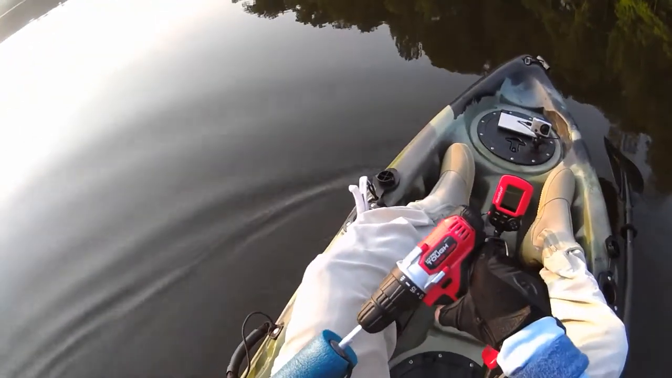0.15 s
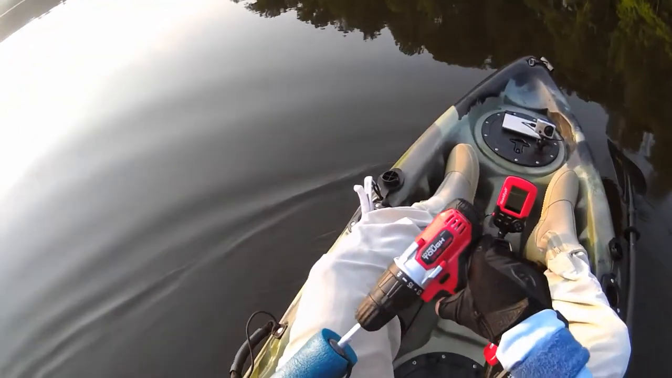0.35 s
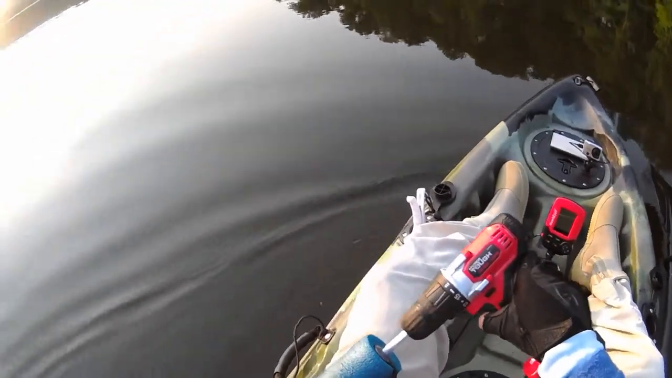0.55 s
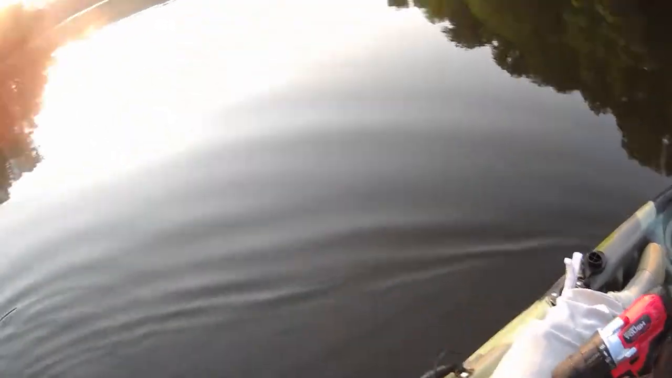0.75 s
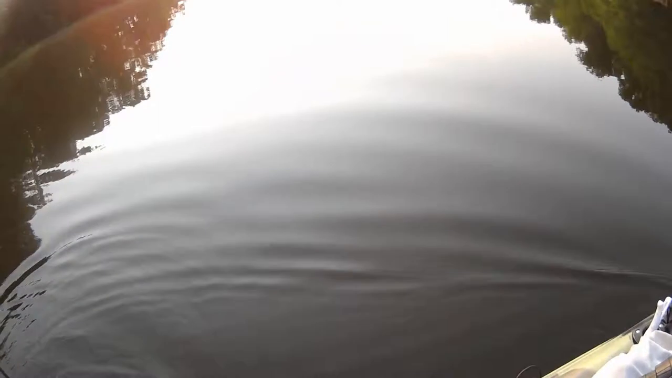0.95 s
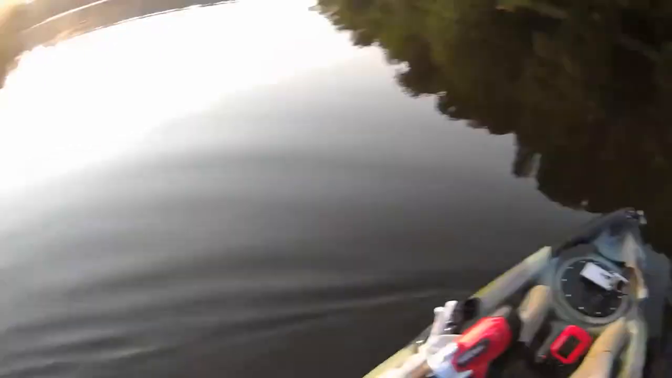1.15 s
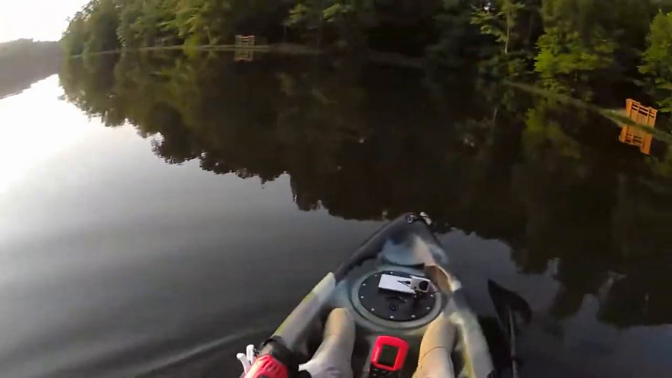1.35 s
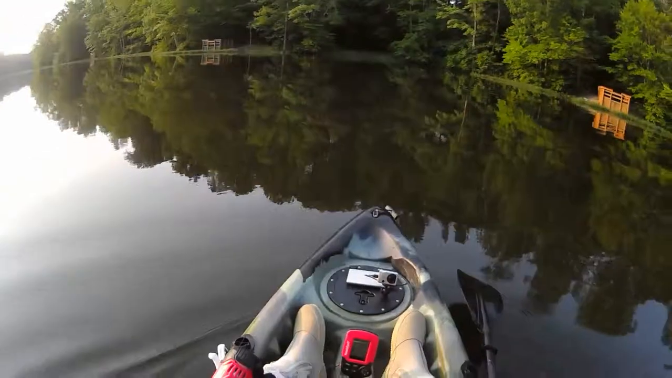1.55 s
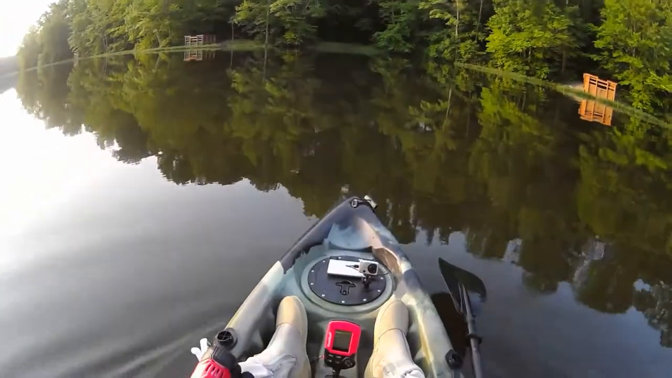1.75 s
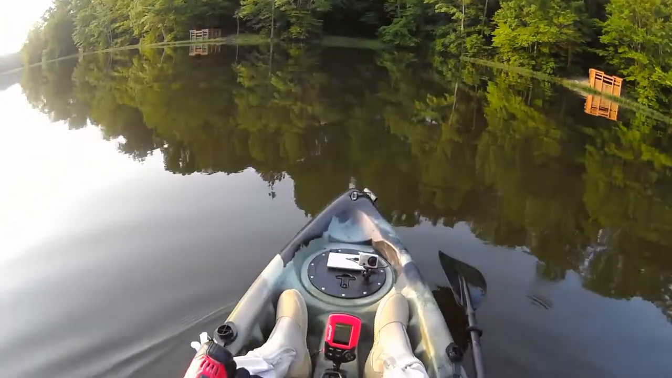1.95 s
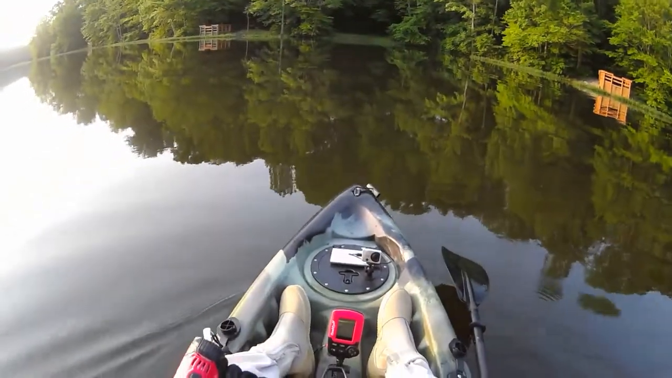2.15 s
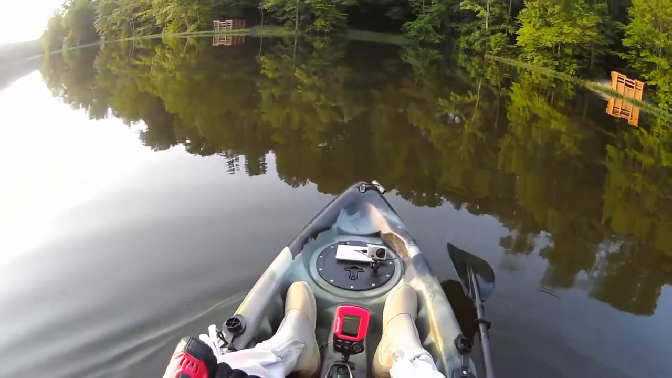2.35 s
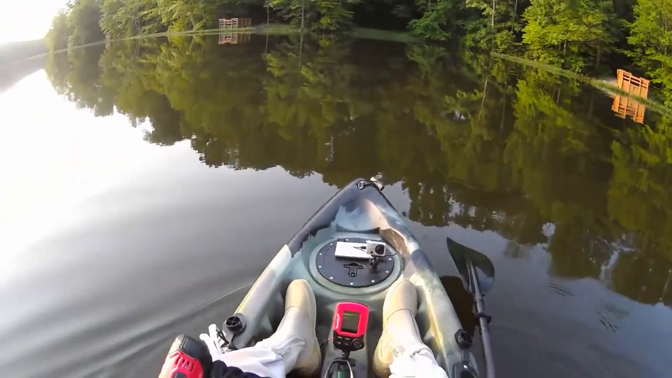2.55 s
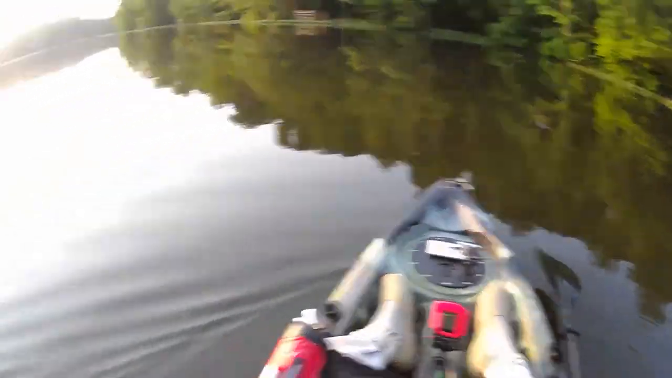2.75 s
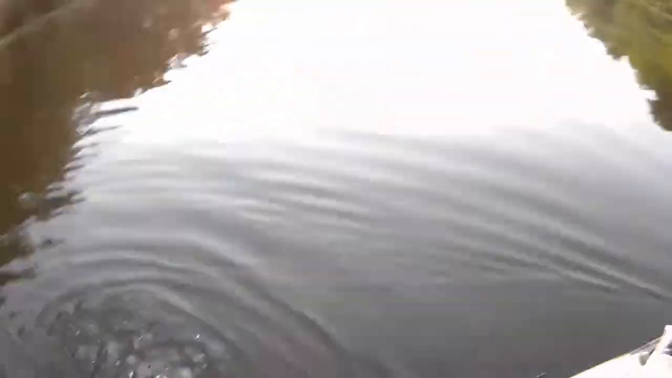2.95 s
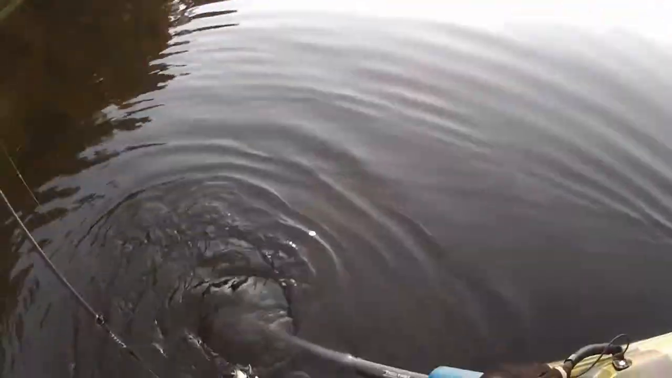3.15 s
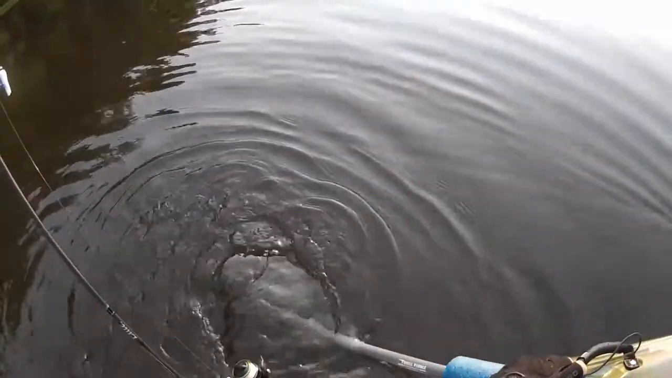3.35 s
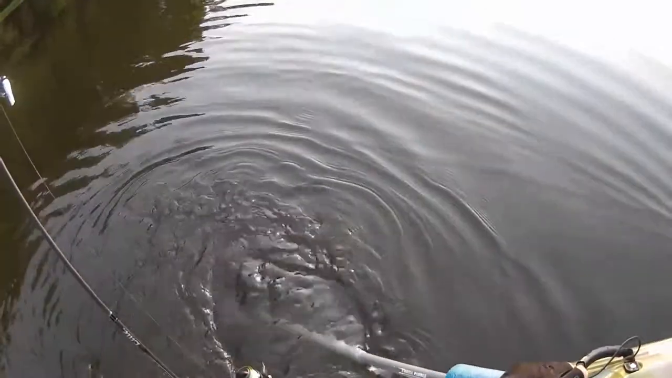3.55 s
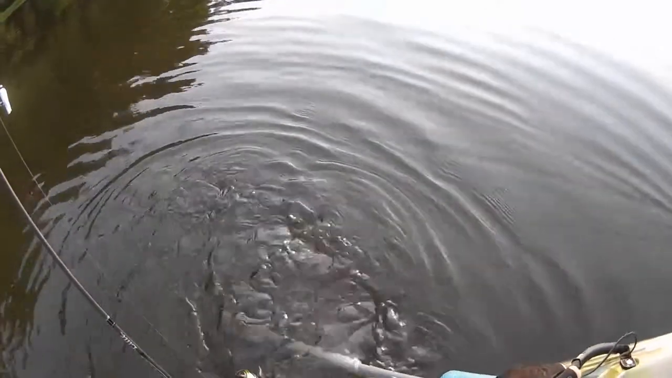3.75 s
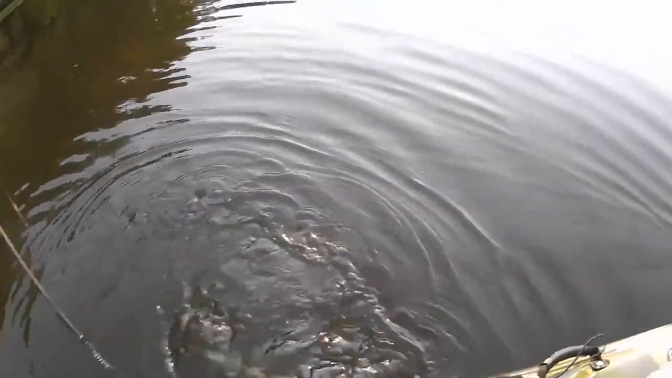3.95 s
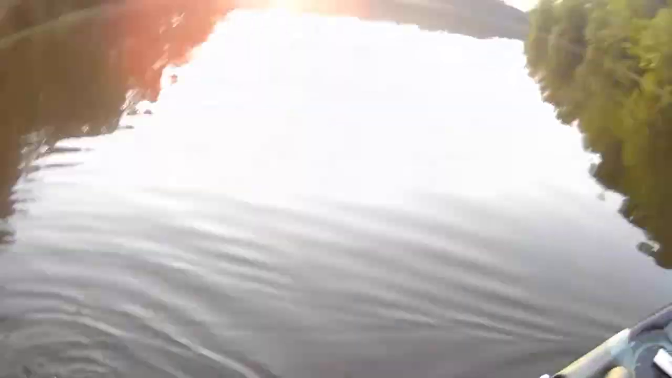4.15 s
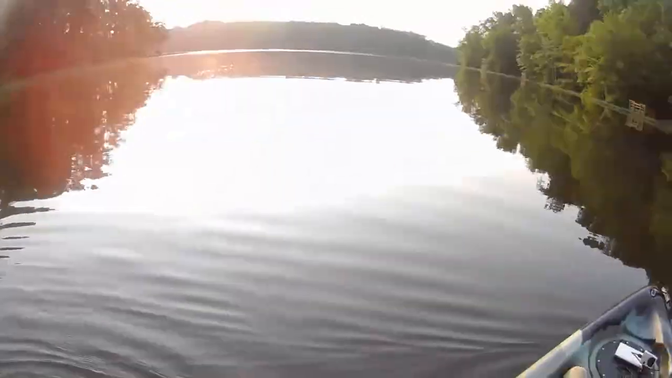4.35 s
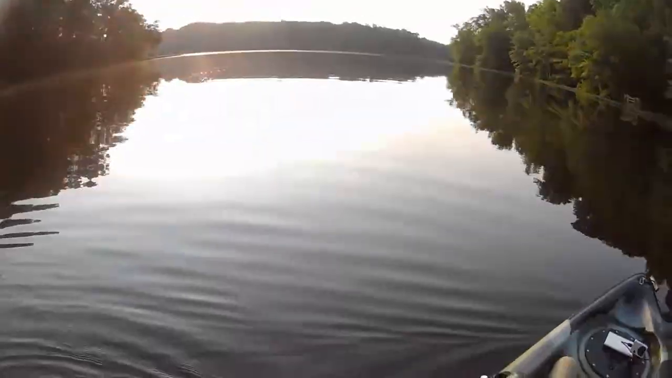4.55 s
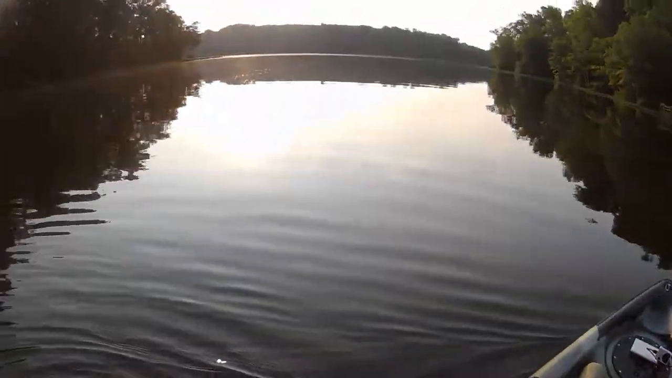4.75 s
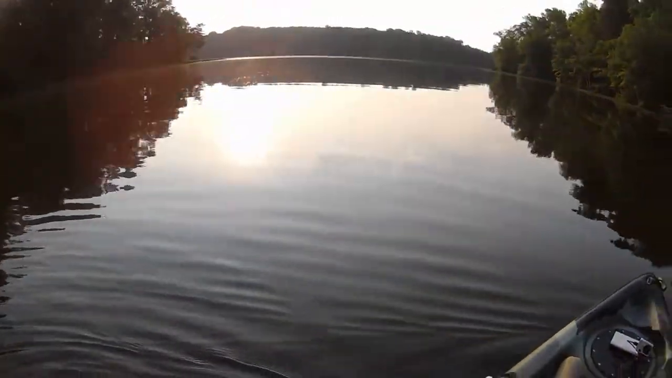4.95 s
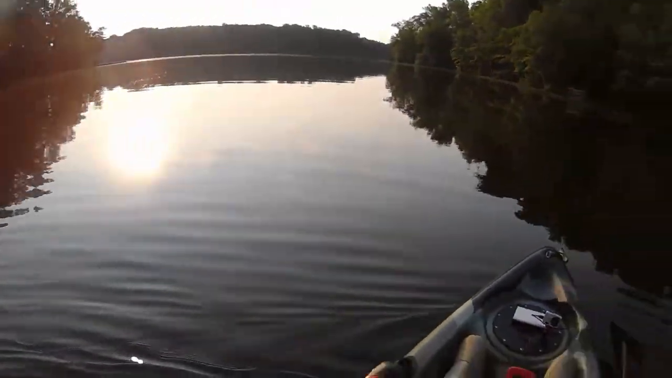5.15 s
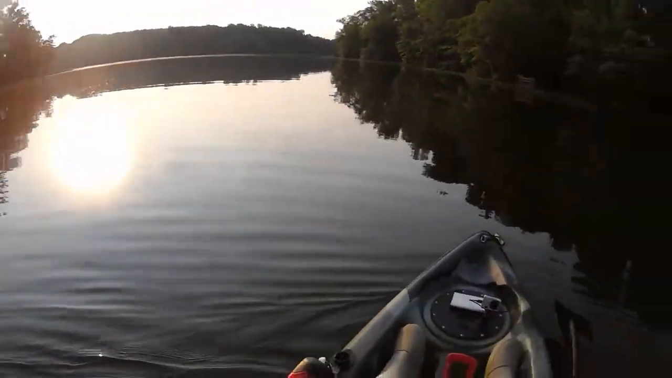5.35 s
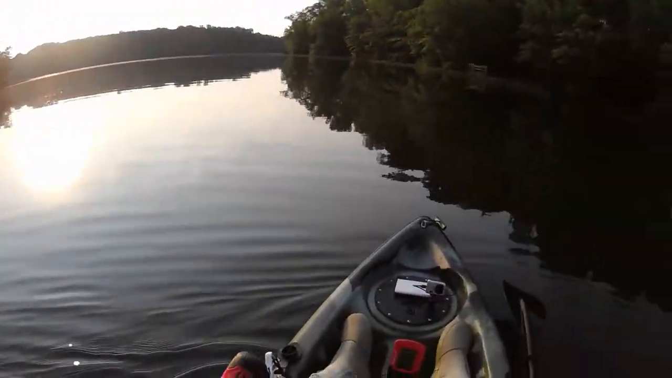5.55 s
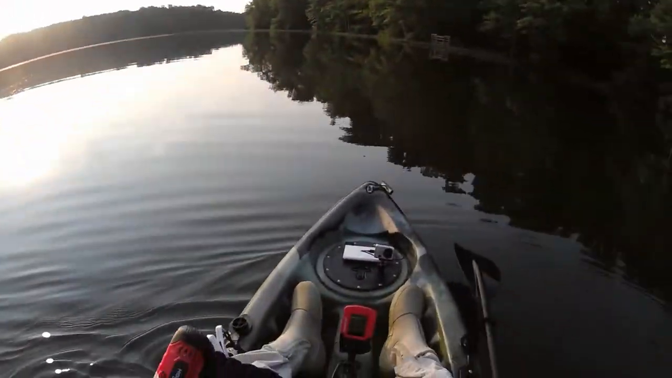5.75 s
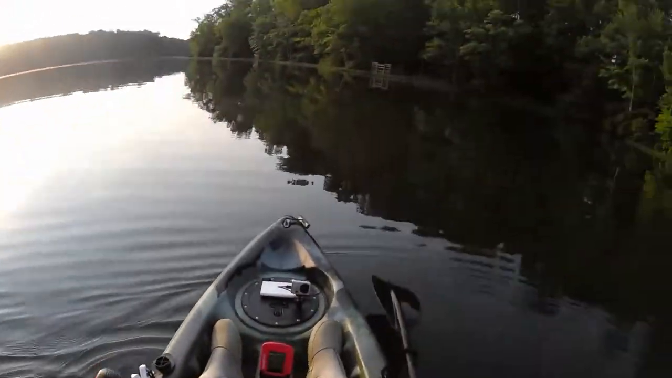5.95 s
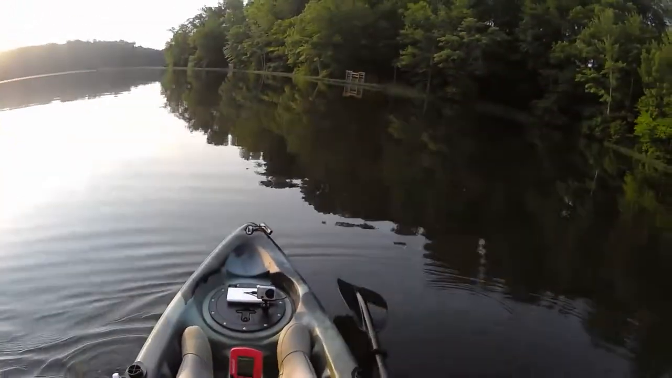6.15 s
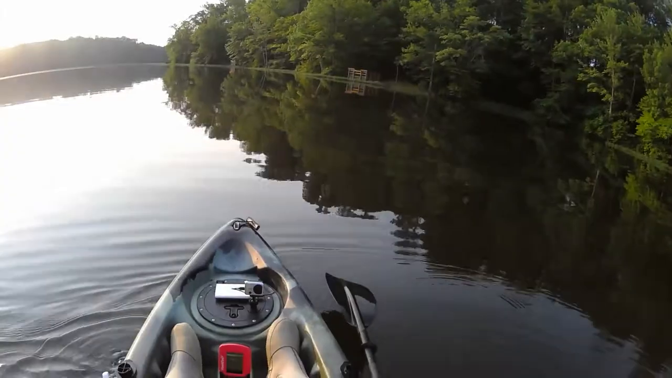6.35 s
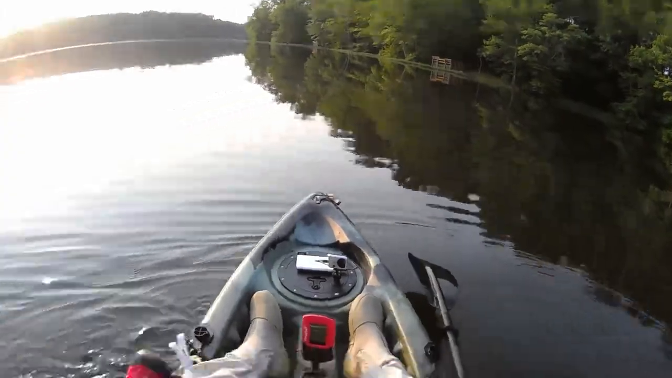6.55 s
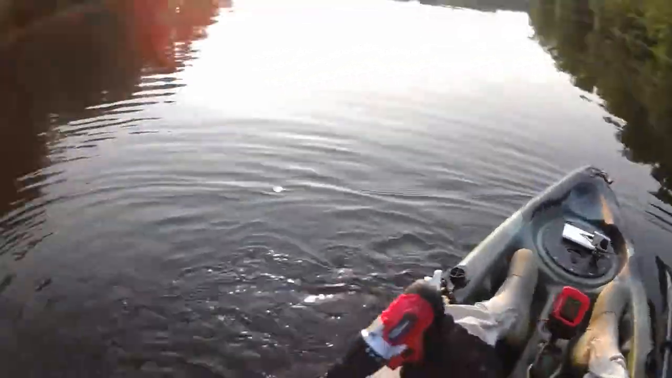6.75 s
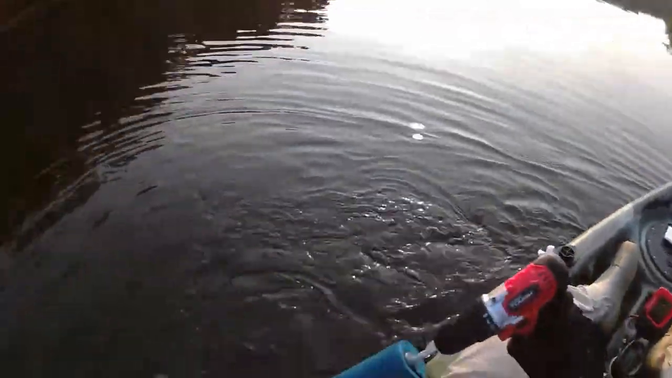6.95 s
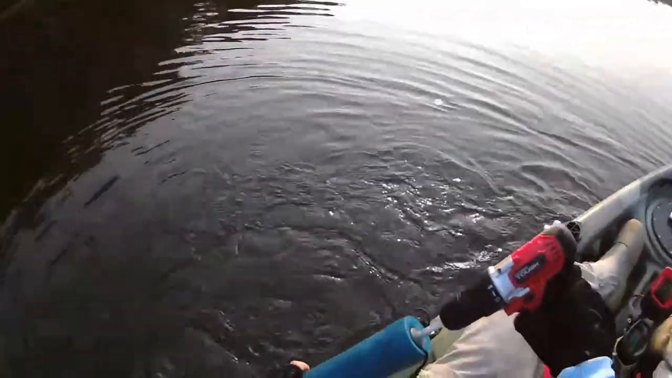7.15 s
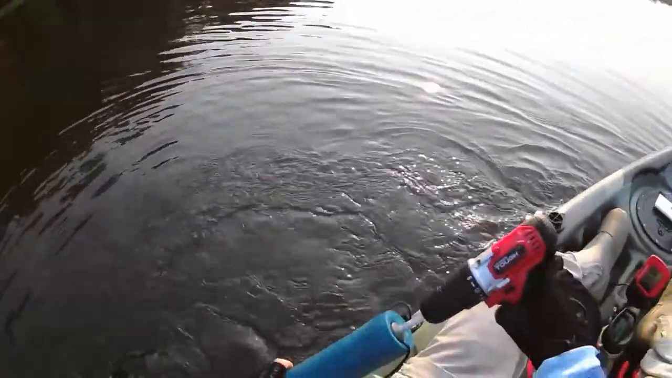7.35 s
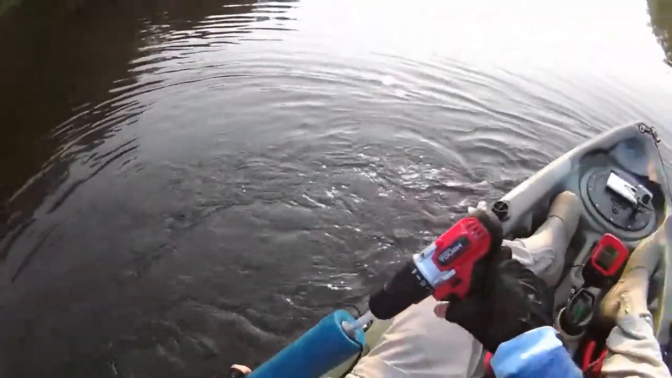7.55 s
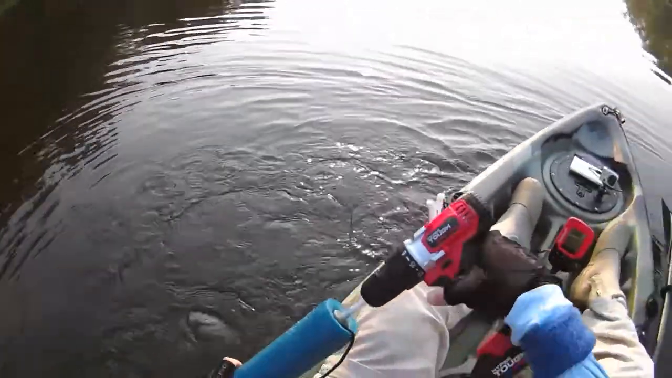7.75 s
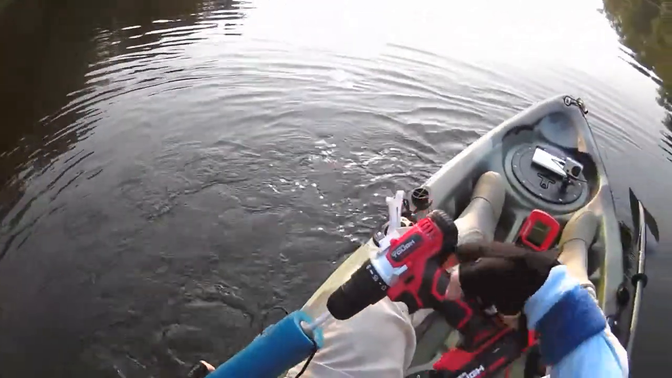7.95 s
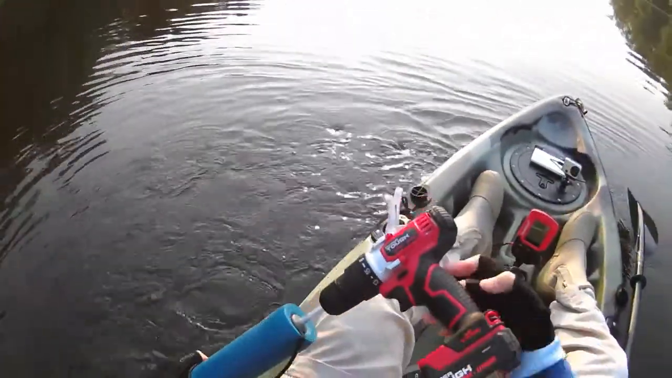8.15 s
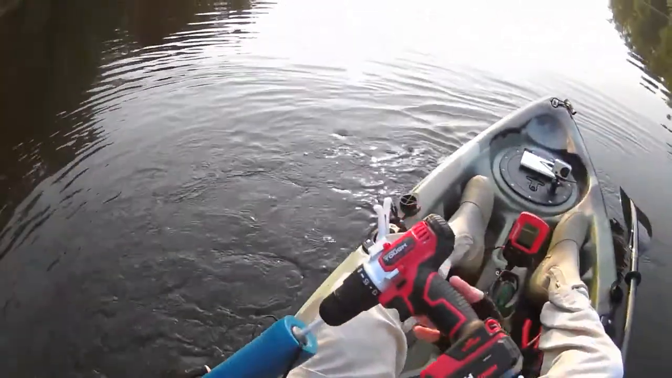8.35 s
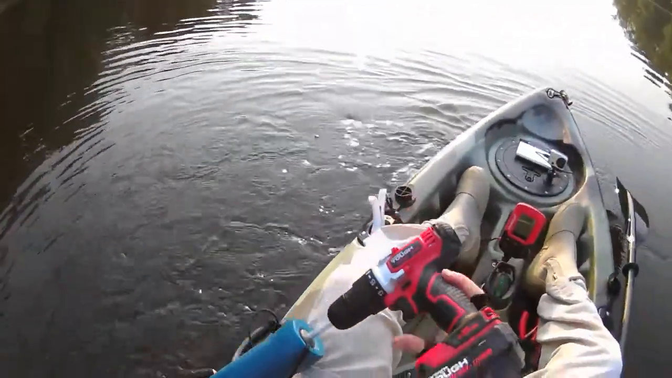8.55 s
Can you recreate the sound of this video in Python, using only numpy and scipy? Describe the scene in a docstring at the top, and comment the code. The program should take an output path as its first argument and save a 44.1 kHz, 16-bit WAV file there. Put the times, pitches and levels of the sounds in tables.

```python
"""On a calm lake, a cordless drill in a kayak spins a propeller shaft, heard from the paddler's head as it turns about.
The trigger is squeezed, eased, held and let go. Motor and two planetary stages (36 motor turns to one shaft turn)
sing as sines at whole multiples of the shaft speed, over noise and tooth knocks that throb once a turn.
The propeller gurgles in rising blips; filtered noise laps as the lake, faint glides whistle as birds, and
damped sines make the thuds, clicks and ticks."""
import sys
import numpy as np
from scipy import signal
from scipy.io import wavfile
from scipy.ndimage import uniform_filter1d

SR = 44100
rng = np.random.default_rng(int(sys.argv[2]) if len(sys.argv) > 2 else 0)


def master_out(mix):
    """Clip the mix to full scale and print it as 16-bit PCM to the path in sys.argv[1]."""
    frames = np.transpose(np.atleast_2d(mix))
    ceiling = np.clip(frames, -1, 1)
    pcm = np.round(ceiling * 32767).astype(np.int16)
    wavfile.write(sys.argv[1], SR, pcm)


N = 383312

GEARING = 36  # motor turns to one shaft turn
# gears start to turn, slack is taken up, braking begins, the drill's sound dies away [s]
START_S, BITE_S, BRAKE_S, STOP_S = 0.3053, 0.3375, 7.49, 7.548
RISE_DB_PER_S = 1306
# motor speed, squeezed, eased, squeezed again, held and braked: (time [s], speed [Hz])
MOTOR_SPEED = [(.29, 130), (.33, 170), (.35, 231), (.37, 272), (.41, 296), (.45, 311), (.47, 313.5),
               (.51, 264), (.54, 228), (.57, 200), (.61, 188), (.65, 196), (.68, 245), (.7, 284),
               (.72, 302), (.76, 318), (.9, 325), (1.3, 329.8), (2.5, 331.1), (3.5, 334.3), (4.9, 337.4),
               (6.5, 338.1), (7.49, 338.1), (7.512, 297), (7.522, 251), (7.534, 187), (7.545, 146),
               (7.58, 99)]
# share of the treble control felt at each frequency: (frequency [Hz], share [1])
TREBLE_SHARE = [(1500, 0.29), (2500, 1), (3200, 1.6), (3650, 0.49), (5000, 0.9), (6000, 0.76), (7600, 0.64)]
# what reaches the microphone as the head turns: (time [s], whole drill [dB], treble [dB], hollow body tone [dB],
# magnetic whine [dB], rotor hum [dB], first-stage mesh [dB])
HEAD_TURNS = [(.3, 3, 9, 4, -37.5, -55, -56), (.35, -0.5, 9.5, 1, -39, -48, -33),
              (.375, -.5, 5.5, 2.5, -38, -50, -58), (.42, -1, 4, 2, -38.5, -49, -52),
              (.45, -2.5, 6, 3, -42.5, -49.5, -40), (.5, -.5, 3, 1, -37, -50, -50),
              (.545, 0, 2.5, 1, -36, -52, -23), (.6, 0.5, 2, 0.5, -34, -55, -42),
              (.65, .5, 1.5, 0, -37, -55, -33), (.69, 1, 1.5, -1, -38, -55.5, -58),
              (.74, 0, 3.5, 0.5, -45.5, -56, -36.5), (.85, -1, 3.5, 6.5, -39.5, -45, -41),
              (1.3, 1, 0.5, 0, -40.5, -61, -43), (2.4, 2, -1.5, -2, -41, -58, -44.5),
              (3.0, 1, 1, 4, -43, -46.5, -50.5), (3.5, 0.5, 2, 4, -45.5, -43, -55),
              (4.3, 0.5, 1, 2, -48, -44.5, -52.5), (5.5, 0.5, 0.5, -3, -42.5, -43.5, -48.5),
              (6.3, 1, -3.5, -2.5, -44, -44.5, -55), (6.6, 1, -2, -2.5, -44, -43, -51),
              (6.76, 1, 3, -2.5, -44, -42, -51), (7.44, 0.5, 5, -4, -44, -43.5, -45.5),
              (7.5, 1, 1.5, -3.5, -45, -46, -53), (7.55, 4, 5.5, 1, -37, -48, -52)]


def gain_of(db):
    """Level: 20 dB is a tenfold amplitude."""
    return 10 ** (np.asarray(db) / 20)


def evened(x):
    """Normalization: scales a signal to rms 1."""
    return x / np.sqrt(np.mean(x ** 2) + 1e-20)


def read(points, hz):
    """Spectral interpolation: reads a curve on a log-frequency axis."""
    f, value = np.transpose(points)
    return np.interp(np.log(hz + 1), np.log(f + 1), value)


def curves(rows, t):
    """Linear interpolation: every column of a table against time."""
    s, *columns = np.transpose(rows)
    return [np.interp(t, s, column) for column in columns]


def slow(rate_hz):
    """Low-passed noise: a smooth random curve of rms 1, cut off at rate_hz."""
    steps = np.arange(0, N + 200, 100)
    b, a = signal.butter(2, rate_hz, fs=SR / 100)
    smooth = evened(signal.lfilter(b, a, rng.standard_normal(len(steps))))
    return np.interp(np.arange(N), steps, smooth)


def coloured(x, field_db):
    """Time-varying filtering: applies a gain over frequency and time to the short-time spectrum."""
    hz, t, z = signal.stft(x, SR, nperseg=512, noverlap=384)
    shaped = z * gain_of(field_db(hz[:, None], t))
    return signal.istft(shaped, SR, nperseg=512, noverlap=384)[1][:N]


def placed(sound, s):
    """Time shift: sets a short sound at s seconds in silence."""
    return np.pad(sound, (round(s * SR), N))[:N]


def lake():
    """Broadband water noise: far low rumble and lapping in drifting patches, swelling around the stop as the wake."""
    # spectrum of the water: (frequency [Hz], relative level [dB per Hz])
    water_spectrum = [(20, -27.5), (50, -7.5), (100, -2.5), (200, -5.5), (300, -6.5), (480, -15.5),
                      (770, -15.5), (1100, -22), (1550, -33), (1850, -44.5), (3000, -47.5), (4700, -48),
                      (6800, -43), (7600, -49)]
    lake_db, wake_db, wake_s = -53, 3.5, .35

    def field_db(hz, t):
        patches = rng.standard_normal((len(hz), len(t)))
        patches = uniform_filter1d(patches, 35, 1)  # along time
        patches = uniform_filter1d(patches, 4, 0)  # along frequency
        depth_db = np.where(hz < 2000, 2.6, 1.2)
        return read(water_spectrum, hz) + depth_db * evened(patches)
    after = np.arange(N) / SR - STOP_S
    swell_db = wake_db * np.exp(-abs(after) / wake_s)
    water = evened(coloured(rng.standard_normal(N), field_db))
    return gain_of(lake_db + swell_db + .7 * slow(6)) * water


def birds():
    """Frequency modulation: faint short gliding whistles from the far shore, scattered at random or set singly."""
    # the clearest whistles: (time [s], length [s], level [dB], middle frequency [Hz], glide [Hz per s])
    clear_whistles = [(.045, .025, -80, 4330, 0), (.162, .03, -74, 2050, 0), (.265, .035, -77, 3950, 0),
                      (7.755, .05, -78, 2820, 1200), (7.83, .04, -77, 1960, -800),
                      (7.845, .05, -81, 2370, -600), (8.045, .035, -79, 3070, -1500),
                      (8.085, .03, -81, 2800, -1500), (8.2, .07, -81, 2150, 300),
                      (8.325, .055, -77, 2880, -400), (8.37, .04, -79, 2630, -500)]
    birds_db, birds_per_s = -90, 30
    scattered, t = np.zeros(N), np.arange(0, .045, 1 / SR)
    for pitch, glide, size in rng.random((40, 3)):
        hz = 1600 + 1300 * pitch ** 1.1
        chirp = np.sin(2 * np.pi * hz * t * (1 + 1.7 * (glide - .6) * t)) * np.hanning(len(t))
        onsets = rng.random(N) < birds_per_s / 40 / SR
        scattered += signal.oaconvolve(onsets, chirp * gain_of(9 * size))[:N]
    out = gain_of(birds_db) * scattered
    for s, length, db, hz, glide in clear_whistles:
        t = np.arange(0, length, 1 / SR)
        chirp = np.sin(2 * np.pi * (hz + glide * (t - length) / 2) * t) * np.hanning(len(t))
        waver = 1 + .6 * evened(uniform_filter1d(rng.standard_normal(len(t)), 150))
        out += placed(gain_of(db) * chirp * waver, s)
    return out


def rub():
    """Friction noise: a soft wide-band brush of glove on plastic."""
    start_s, rise_s, level_db = 8.615, .03, -72
    u = np.maximum(np.arange(N) / SR - start_s, 0) / rise_s
    b, a = signal.butter(1, [1200, 5000], "band", fs=SR)
    brush = evened(signal.lfilter(b, a, rng.standard_normal(N)))
    return gain_of(level_db) * u * np.exp(1 - u) * brush


def bumps():
    """Impact on a resonant hull: dull thuds of a ring and noise over a deeper boom, rising fast and falling slower."""
    # shaft and drill bumping the hull, and jolts of the head:
    # (time [s], level before the envelope [dB], time scale [s], ring frequency [Hz])
    hull_bumps = [(1.14, -35, 0.062, 85), (1.145, -36, .05, 160), (2.835, -34, 0.09, 65),
                  (2.84, -35, .07, 130), (3.089, -35, 0.045, 290), (4.088, -28, 0.055, 235),
                  (4.154, -23.5, 0.06, 240), (4.185, -30, .06, 335), (4.255, -29.5, 0.06, 245),
                  (4.285, -32, .05, 320), (4.368, -25.5, 0.055, 250), (4.485, -25.5, 0.058, 245)]
    out = np.zeros(N)
    for s, db, length, hz in hull_bumps:
        u = np.arange(0, .25, 1 / SR) / length
        thud = np.sin(2 * np.pi * hz * length * u)
        # noise around the ring, then the boom
        for low_hz, high_hz, share in [(.55 * hz, 1.5 * hz, .4), (60, 190, .2)]:
            sos = signal.butter(2, [low_hz, high_hz], "band", fs=SR, output="sos")
            noise = signal.sosfilt(sos, rng.standard_normal(2 * len(u)))
            thud = thud + share * evened(noise[len(u):])  # the filter has settled
        envelope = u * np.exp(1 - (2.0 * u) ** 2)
        out += placed(gain_of(db) * thud * envelope, s)
    return out


def damped_rings(rows, rough):
    """Damped free vibration: short decaying sines with a noisy strength."""
    out, t = np.zeros(N), np.arange(0, .3, 1 / SR)
    for s, db, hz, t60 in rows:
        span = int(SR / hz * 2)  # two periods
        noise = uniform_filter1d(rng.standard_normal(len(t)), span)
        wobble = 1 + rough * evened(uniform_filter1d(noise, span))
        envelope = gain_of(db - 60 * t / t60) * (1 - np.exp(-t * hz / 3)) ** 2
        out += placed(envelope * wobble * np.sin(2 * np.pi * hz * t), s)
    return out


def clicks_and_taps():
    """Modal impact response: trigger clicks excite five modes; ticks of gear slack, grip and water drips excite
    one each."""
    # modes of the trigger: (frequency [Hz], relative level [dB], t60 [s])
    trigger_modes = [(1710, -10, 0.027), (2890, -0.5, 0.027), (3150, 0.5, 0.024), (4520, -14, .018),
                     (5900, -18, 0.016)]
    # trigger clicks: (time [s], level before the envelope [dB])
    trigger_clicks = [(.21, -49), (0.338, -20.5)]
    # ticks of gear slack, grip and water drips: (time [s], level before the envelope [dB], frequency [Hz], t60
    # [s])
    single_taps = [(.08, -50, 1190, .07), (.24, -62, 1490, 0.18), (0.273, -46, 1850, 0.069),
                   (0.317, -24, 1618, 0.05), (.298, -41, 3250, .03), (.316, -37, 3300, .02),
                   (.323, -35, 2950, .025), (.33, -33, 1480, .05), (0.338, -23.5, 2230, 0.031),
                   (7.523, -27, 1420, .05), (8.045, -46.5, 1190, .07), (8.624, -50, 1250, .08),
                   (8.63, -48, 700, .05), (8.649, -56, 1900, 0.044), (8.648, -67, 2550, .04),
                   (8.65, -72, 4900, .04), (8.652, -73, 5800, .03)]
    clicks = [(s, db + mode_db, hz, t60) for s, db in trigger_clicks for hz, mode_db, t60 in trigger_modes]
    return damped_rings(clicks + single_taps, rough=0.55)


def shaft():
    """Rotation as integrated speed: shaft angle in turns, plain and unsteady, as the load slows it once a turn."""
    turns = np.cumsum(curves(MOTOR_SPEED, np.arange(N) / SR)[0]) / SR / GEARING
    turns = turns - turns[round(1.107 * SR)]  # sets the zero of the angle
    return turns, turns + 0.0005 * np.sin(2 * np.pi * turns) + .0004 * slow(6.9)


def throb(turns, depth_db, lag, alternate=0, planets=0):
    """Amplitude modulation by rotation: the bent shaft loads the gears once a turn, less so twice a turn."""
    angle = 2 * np.pi * (turns - lag)
    shape = np.cos(angle) + 0.5 * np.cos(2 * angle)
    shape = shape + planets * np.cos(3 * angle)  # three planets pass
    shape = shape + alternate * np.cos(angle / 2)  # every other turn differs
    return evened(gain_of(depth_db * shape))


def gurgle(turns):
    """Bubble resonance: bubbles pulled under by the blades, each a short rising blip, bunched once a turn."""
    # the propeller churning near the surface: (time [s], gurgle level [dB])
    churn = [(.7, -58), (1.0, -59), (1.4, -56), (2.7, -52.5), (3.0, -40), (3.3, -37), (3.9, -37.5),
             (4.15, -41), (4.4, -43), (5.0, -47.5), (7.4, -52.5), (7.5, -70.5)]
    out, t = np.zeros(N), np.arange(0, .04, 1 / SR)
    rate = 700 * throb(turns, depth_db=5.5, lag=.15, planets=.4)  # bubbles per second
    for pitch, size in rng.random((30, 2)):
        hz = 580 * 1.7 ** pitch
        blip = np.sin(2 * np.pi * hz * t * (1 + 3.0 * t)) * t * np.exp(-t * hz / 2.2)
        onsets = rng.random(N) < rate / 30 / SR
        out += signal.oaconvolve(onsets, evened(blip) * gain_of(6.7 * size))[:N]
    return gain_of(curves(churn, np.arange(N) / SR)[0]) * evened(out)


def motor(t):
    """Torque balance: speed [Hz], torque [dB] from water drag and speeding up or braking, on-off envelope [dB]."""
    inertia_hz_per_s = 650  # speeding up at this rate doubles the torque
    ripple = 0.43  # torque ripple that never goes
    fall_db_per_s = 1153
    hz = curves(MOTOR_SPEED, t)[0]
    gaining = uniform_filter1d(np.gradient(hz, t), size=700)
    torque = np.hypot(1 + gaining / inertia_hz_per_s, ripple) / np.hypot(1, ripple)
    running_db = np.minimum(RISE_DB_PER_S * (t - START_S), fall_db_per_s * (STOP_S - t))
    return hz, 20 * np.log10(torque), np.minimum(0, running_db)


def housing_db(hz):
    """Resonant radiation: how well the plastic housing radiates each frequency."""
    # broad radiation: (frequency [Hz], relative level [dB per Hz])
    housing_spectrum = [(35, -49), (60, -25), (268, -9), (334, -0.5), (511, -7), (678, -8.5), (864, -8),
                        (976, -6.5), (1100, -3.5), (1490, 3), (1800, -2), (2280, -12), (2520, -11),
                        (3560, -21.5), (6140, -24), (7200, -30.5), (7510, -39.5), (9760, -71),
                        (16500, -120)]
    # housing resonances: (frequency [Hz], width [Hz], height [dB])
    shell_modes = [(700, 61, 8), (928, 97, 10), (1280, 180, 0), (3130, 260, 2.5), (1710, 220, -3.5), ]
    peaks_db = sum(db / (1 + (2 * (hz - f) / width) ** 2) for f, width, db in shell_modes)
    return read(housing_spectrum, hz) + peaks_db


def chatter(turns):
    """Source and filter: tooth knocks, some recurring every second turn, and brush hiss ring the housing."""
    # share of the body control felt at each frequency: (frequency [Hz], share [1])
    body_share = [(380, 0.17), (540, 0.47), (680, 0.97), (950, 0.041), (1090, 0)]
    slots = 4800  # angular slots in two turns
    worn = gain_of(2.93 * rng.exponential(1, slots)) * (rng.random(slots) < .2)
    slot = np.floor(turns / 2 * slots).astype(int)
    repeated = worn[slot % slots] * (np.diff(slot, prepend=slot[0]) > 0)
    knocks = gain_of(3.7 * np.minimum(rng.exponential(1, N), 4)) * (rng.random(N) < 900 / SR)
    hiss = 1.03 * rng.standard_normal(N)
    drive = hiss + 0.5 * evened(knocks) + 0.37 * evened(repeated)
    drive = drive * throb(turns, depth_db=1.4, lag=.42) * gain_of(.45 * slow(20))

    def field_db(hz, t):
        _, treble_db, body_db, *_ = curves(HEAD_TURNS, t)
        return housing_db(hz) + read(TREBLE_SHARE, hz) * treble_db + read(body_share, hz) * body_db
    return evened(coloured(drive, field_db))


def tone(angle, order, waver_db, rate_hz):
    """Order of rotation: a sine at a multiple of the shaft speed, rms 1, wavering in strength."""
    strength = np.sqrt(2) * evened(gain_of(waver_db * slow(rate_hz)))
    return strength * np.sin(2 * np.pi * (order * angle + rng.random()))


def whine(t, angle, hz, torque_db, whine_db):
    """Magnetic force on the motor: a tone at three times its speed that follows torque and housing resonance."""
    coast_s, grip_s = 0.034, 0.02  # the current is cut, then the brake grips for a moment
    coasting = np.clip(np.minimum(t - BRAKE_S, BRAKE_S + coast_s - t) / 0.0057, 0, 1)
    loaded_db = torque_db + np.minimum(0, RISE_DB_PER_S * (t - BITE_S))
    loaded_db = loaded_db - 25 * coasting + 0.52 * (housing_db(3 * hz) - housing_db(3 * hz.max()))
    loaded_db = loaded_db - 2500 * np.maximum(t - BRAKE_S - coast_s - grip_s, 0)
    waver_db = np.interp(t, [2.0, 4.5], [.5, 2.5])
    return gain_of(whine_db + loaded_db) * tone(angle, order=108, waver_db=waver_db, rate_hz=28)


def rotor_hum(turns, angle, hum_db):
    """Once-per-revolution vibration: a tone at the motor speed, throbbing with the shaft."""
    return gain_of(hum_db) * throb(turns, depth_db=2.5, lag=0.4) * tone(angle, order=36, waver_db=1.5, rate_hz=41)


def mesh_tone(t, turns, angle, torque_db, slack, mesh_db):
    """Planetary sideband: the planets carry the mesh point round, which shifts the tone one order up."""
    depth_db = np.interp(t, [2.0, 5.0], [1.0, 3.9])  # it beats harder as the run goes on
    beat = throb(turns, depth_db=depth_db, lag=.99, alternate=.35, planets=1.2)
    waver_db = np.interp(t, [2.5, 4.5], [2.8, 1.2])
    level_db = mesh_db + 0.44 * torque_db - 15 * slack
    return gain_of(level_db) * beat * tone(angle, order=271, waver_db=waver_db, rate_hz=31)


def gear_tones(t, turns, angle, hz, slack, level_db, treble_db):
    """Harmonic series of the gear train: each gliding tone swells as it crosses a resonance of the housing."""
    # tones of the gear train: [multiple of the shaft speed]
    orders = [12, 43, 46, 60, 66, 70, 76, 90, 104, 111, 126, 135, 146, 155, 160, 165, 180, 186, 216, 235,
              432, 540]
    # one row a tone: (level [dB], relative throb depth [dB], loudest at [turns],
    # change from start to end of the run [dB], gain per unit of lost speed [dB])
    tone_levels = [(-65.5, 0.7, 0.68, -2.5, -5.5), (-63, 1.5, 0.72, -5, -3.5), (-57, 3, 0.73, 0.5, -5),
                   (-60, -3, 0.38, 6, -1), (-58.5, 6, 0.087, 6, -3.5), (-54.5, 2.5, 0.075, 0.5, 2.5),
                   (-59, 3, 0.38, -9, 2.5), (-55, 1, 0.4, -3.5, 0), (-49.5, -1, 0.88, 6.5, -5.5),
                   (-54, -1.5, 0.22, 11, 5.5), (-57, 2, .4, -2, 0), (-48.5, 0.6, 0.55, 1.5, -3),
                   (-52, -4, 0.53, 1, -2.5), (-45.5, 4.5, .48, 0, 0), (-65.5, 2.5, 0.35, 6.5, 2.5),
                   (-45.5, 2.5, 0.1, 2, -8), (-44.5, 4, .34, 5, 5), (-63, 1.5, 0.32, 8.5, 1),
                   (-50.5, 0, 0.51, 0, 3.5), (-58.5, -1, 0.33, -5, 6.5), (-63, 1.0, .1, 0, -25),
                   (-64, 4, .36, 5, 21), ]
    # rise and fall of a gear tone and three motor overtones:
    # (time [s], order 155 [dB], fifth [dB], twelfth [dB], fifteenth [dB])
    overtone_swells = [(.43, 0, 4, 0, 0), (.485, -4, 0, 0, 5), (.525, -4, 0, 0, -16), (.555, -4, 0, 0, 6),
                       (.6, -4, 0, 0, -4), (.65, -4, 0, 0, 7), (.69, -2, 3, 0, -8), (.73, 0, 5, -6, 0),
                       (.9, -6, 4, -12, 0), (1.3, -6, 3, 3, -2), (2.7, -8, -2, 3, 0), (3.0, -5, 1, 0, 1),
                       (3.6, 0, 2.5, -10, 0), (4.2, -7, 2, 5, -3), (4.7, -6, -1, 5, 1), (5.3, 2, -1, 0, 2),
                       (6.2, 4, -8, -10, -2), (6.9, -1, 1, -1, 2), (7.3, -5, 0, 1, -4)]
    eased = slack * np.clip((t - .4) / .08, 0, 1)
    late = np.clip((t - 4.2) / 6, -.5, .5)
    wear = np.interp(t, [3.5, 5.0], [.5, 1.1])  # the throb deepens as the run goes on
    swells_db = dict(zip((155, 180, 432, 540), curves(overtone_swells, t)))
    out = np.zeros(N)
    for order, (db, throb_db, lag, change_db, eased_db) in zip(orders, tone_levels):
        coarse_hz = hz[::64] * order / GEARING
        top_hz = coarse_hz.max()
        glide_db = np.repeat(housing_db(coarse_hz) - housing_db(top_hz), 64)[:N]
        heard_db = db + level_db + read(TREBLE_SHARE, top_hz) * treble_db + 0.65 * glide_db
        heard_db = heard_db + change_db * late + eased_db * eased
        heard_db = heard_db + 6 * eased * slow(30)  # unsteady below full speed
        heard_db = heard_db + swells_db.get(order, 0)
        gain = gain_of(heard_db) * throb(turns, throb_db * wear, lag)
        out += gain * tone(angle, order=order, waver_db=1.4, rate_hz=4.2)
    return out


def drill():
    """Superposition: chatter, propeller gurgle, whine, rotor hum, mesh tone and lesser gear tones of one rotation."""
    chatter_db, speed_db_per_octave = -33, 8
    strain_share = 0.12  # share of the torque in dB
    t = np.arange(N) / SR
    turns, angle = shaft()
    hz, torque_db, running_db = motor(t)
    level_db, treble_db, _, whine_db, hum_db, mesh_db = curves(HEAD_TURNS, t)
    # chatter and gear tones grow with speed and torque
    level_db = level_db + speed_db_per_octave * np.log2(hz / hz.max()) + strain_share * torque_db
    slack = (1 - hz / hz.max()) * (t < BRAKE_S)  # how far below full speed before the brake
    out = gain_of(chatter_db + level_db) * chatter(turns)
    out += gurgle(turns)
    out += whine(t, angle, hz, torque_db, whine_db)
    out += rotor_hum(turns, angle, hum_db)
    out += mesh_tone(t, turns, angle, torque_db, slack, mesh_db)
    out += gear_tones(t, turns, angle, hz, slack, level_db, treble_db)
    return out * gain_of(np.maximum(running_db, -200))


def scene():
    """Superposition: the pressures of all sources add at one microphone."""
    return (lake() + birds() + rub() + bumps() + clicks_and_taps() + drill())[None]


def record(dry):
    """Band-limiting: the microphone's bass roll-off, an upper edge and the recorder's faint noise floor."""
    edge_hz = 7560
    b, a = signal.butter(2, 42.0, "high", fs=SR)
    edge = signal.firwin(401, edge_hz, window=("kaiser", 9), fs=SR)[None]
    limited = signal.oaconvolve(signal.lfilter(b, a, dry), edge, "same")
    return limited + gain_of(-99) * rng.standard_normal(dry.shape)


dry = scene()
out = record(dry)
master_out(out)
```